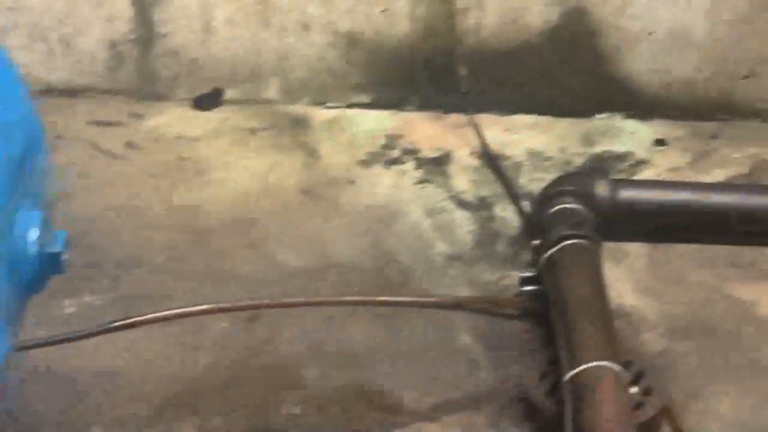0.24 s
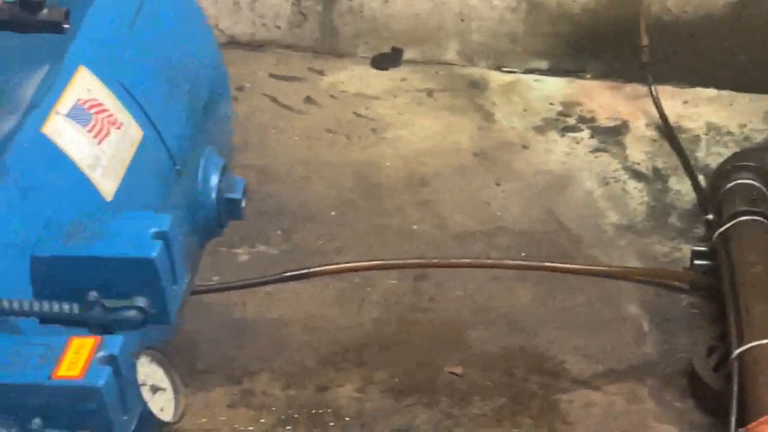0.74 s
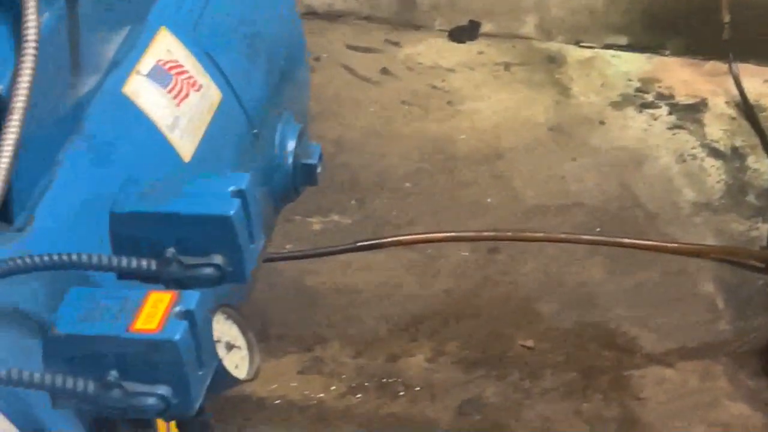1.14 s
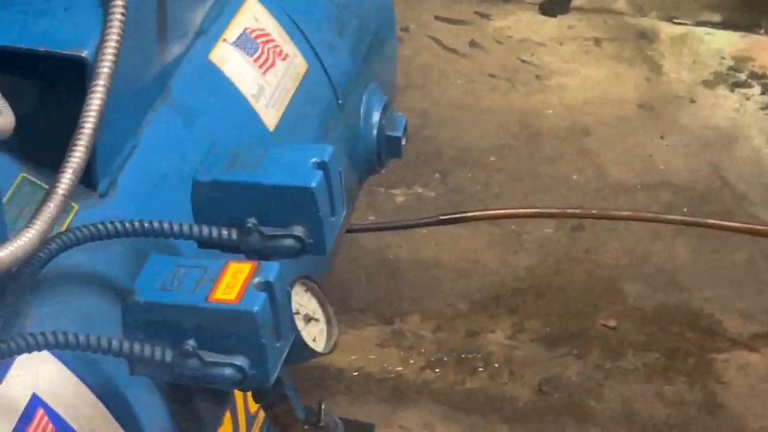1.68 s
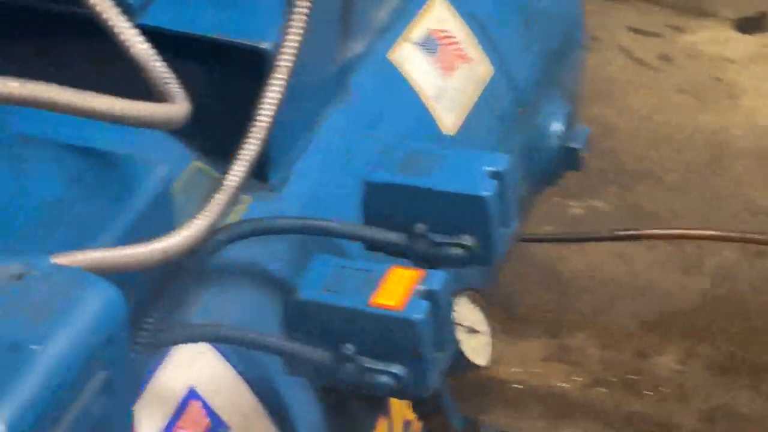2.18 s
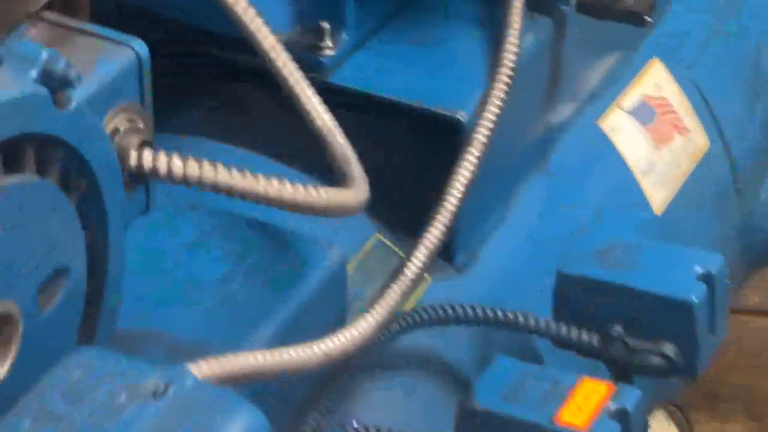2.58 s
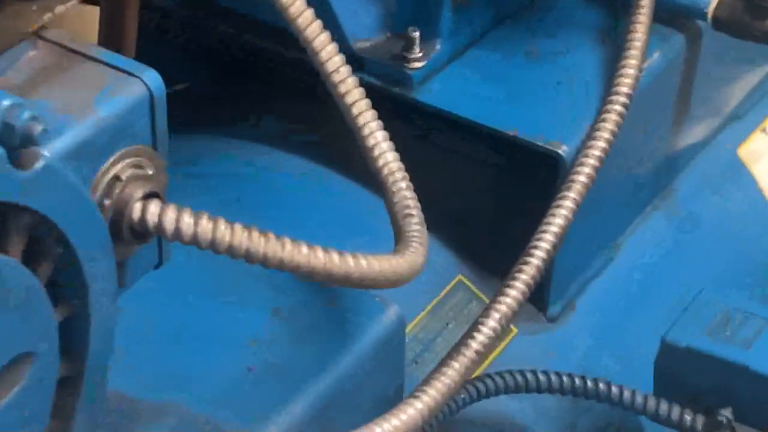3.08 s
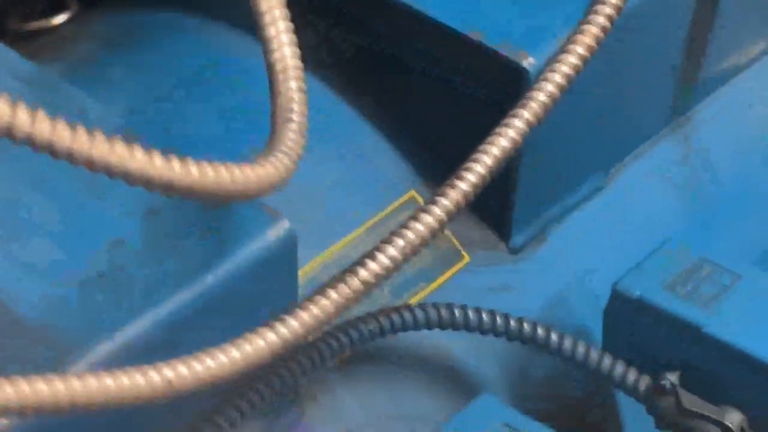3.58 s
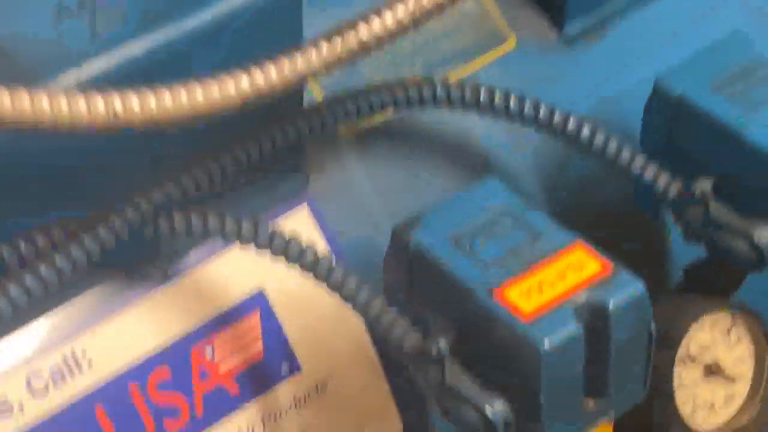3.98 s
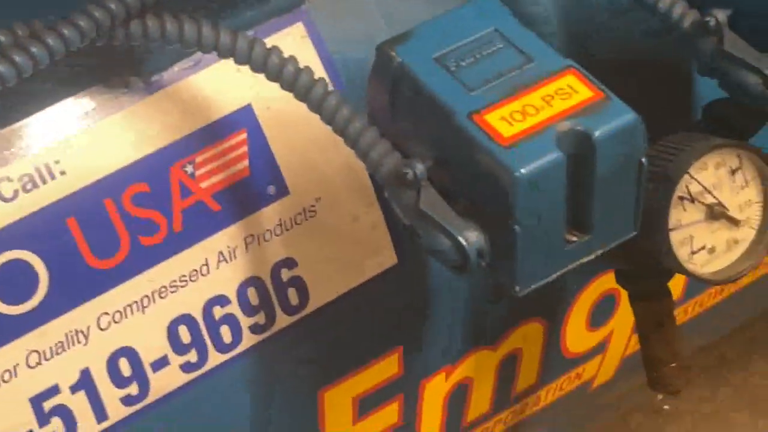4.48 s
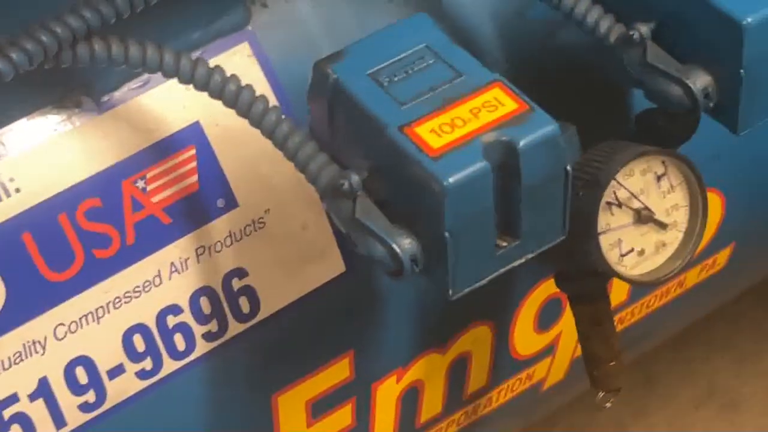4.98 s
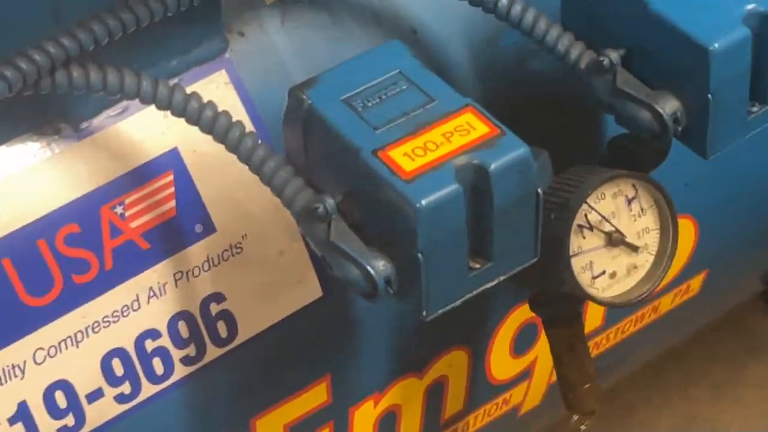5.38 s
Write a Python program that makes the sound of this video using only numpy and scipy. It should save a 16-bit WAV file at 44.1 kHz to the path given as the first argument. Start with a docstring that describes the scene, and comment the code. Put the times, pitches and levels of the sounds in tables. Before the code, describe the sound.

Close handheld stereo in a concrete workshop: a belt-driven piston compressor thumps rapidly, ringing its steel tank. A pressure switch snaps, the strokes stumble and slow to a stop, and an unloader valve releases a bright hiss that fades over a couple of seconds. A steady, raspy electrical buzz remains, getting brighter and louder as the microphone moves in.

```python
"""A belt-driven piston compressor thumps on its tank in a concrete workshop; each stroke rings tank and room.
A mains-driven magnet buzzes all along, tapping its box twice per mains cycle, over hum and room murmur.
The pressure switch snaps, the pump coasts to a halt and the unloader blows off with a fading hiss.
The buzz grows as the microphone moves in towards the switches, through standing waves that shift its colour."""
import sys
import numpy as np
from scipy.fft import rfft, irfft, next_fast_len
from scipy.io import wavfile
from scipy.ndimage import map_coordinates

SR = 44100
rng = np.random.default_rng(int(sys.argv[2]) if len(sys.argv) > 2 else 0)


def int16_out(signal):
    """Quantize to a 16-bit WAV file."""
    q = np.round(np.clip(np.atleast_2d(signal).T, -1, 1) * 32767)
    wavfile.write(sys.argv[1], SR, q.astype(np.int16))


N = 248264  # length in samples


def amp(db):
    """Turn decibels into a plain factor."""
    return 10 ** (np.asarray(db) / 20)


def unit(x):
    """Scale a signal to rms 1."""
    return x / np.sqrt(np.mean(x ** 2) + 1e-20)


def bell(offset, width):
    """A smooth hump of height 1, down to 1/e at one width from its middle."""
    return np.exp(-(offset / width) ** 2)


def along(points, hz):
    """Read (pitch_hz, value) points at any frequency, on a log axis."""
    point_hz, values = np.transpose(points)
    return np.interp(np.log(hz + 1), np.log(point_hz + 1), values)


def curves(rows, t=None):
    """Read each column after the time at times t (every sample by default)."""
    times, *columns = np.transpose(rows)
    if t is None:
        t = np.arange(N) / SR
    return [np.interp(t, times, column) for column in columns]


def wobble(rate, count=N):
    """A smooth random curve with `rate` random points a second."""
    points = rng.standard_normal(int(N * rate / SR) + 4)
    return map_coordinates(points, [np.arange(count) * rate / SR])


def filtered(x, response):
    """Shape x with a complex response given as a function of frequency."""
    size = next_fast_len(N + SR // 4)
    spectrum = rfft(x, size) * response(np.fft.rfftfreq(size, 1 / SR))
    return irfft(spectrum, size)[..., :N]


def causal(db):
    """A response with this colour in dB that rings only after the blow."""
    cepstrum = irfft(np.log(amp(db)))
    half = cepstrum[:len(cepstrum) // 2]
    return np.exp(rfft(2 * half, len(cepstrum)) - cepstrum[0])


def burst(s, rise, t60):
    """Envelope that climbs 20 dB per rise time up to time s, then falls 60 dB in t60 seconds."""
    t = np.arange(N) / SR - s
    return amp(np.where(t < 0, 20 * t / rise, -60 * t / t60))


# how wide the sound lies between left and right: pitch_hz, side_level_db (against the middle)
STEREO_WIDTH = [(60, -21), (180, -7.5), (400, -6), (1100, -3.5), (1800, -8), (2250, -37), (3200, -6),
                (4300, -51), (6500, -73), (7700, -26), (8600, -55), (9600, -66)]


def rush(spectrum, lo_hz=1, hi_hz=SR):
    """Stereo noise of rms 1, with the given spectrum between two soft edges."""
    def response(hz):
        edges = np.sqrt((1 + (lo_hz / (hz + 1)) ** 20) * (1 + (hz / hi_hz) ** 20))
        mid_and_side = np.array([np.ones(len(hz)), amp(along(STEREO_WIDTH, hz))])
        return amp(along(spectrum, hz)) / edges * mid_and_side

    mid, side = filtered(rng.standard_normal((2, N)), response)
    return unit(np.array([mid + side, mid - side]))


TURN_S = .10895  # one crank turn under power
POWERED_RING_DB = -12.5  # free ringing left beside the throb

# strokes and knocks of one powered turn: share_of_turn, level_db, thump_hz, spread_cycles
POWERED_STROKES = [(-.004, -4.5, 345, .6), (.02, -17, 560, .9), (.155, -19.5, 375, 1.5),
                   (.245, -18, 240, .9), (0.41, -10.5, 330, .65), (.465, -15.5, 390, .9),
                   (.585, -20, 385, 1.1), (.775, -12.5, 240, .8), (.885, -22, 570, 1.5)]

# strokes while the pump coasts and rocks to rest: start_s, level_db, thump_hz, spread_cycles
COASTING_STROKES = [(.654, -8.5, 368, 0.76), (.685, -20.5, 255, 1), (.7, -16.5, 250, .7),
                    (.747, -16, 233, .7), (.766, -13.5, 253, 0.83), (.779, -9.5, 340, 0.65),
                    (.84, -14.5, 322, .6), (.897, -14, 224, 0.78), (.916, -20, 230, .7),
                    (.936, -11, 358, 0.9), (.952, -15.5, 300, .5), (.982, -15, 330, 1),
                    (1.027, -25.5, 558, 6.2), (1.048, -28, 550, 4), (1.106, -22, 225, 0.89),
                    (1.118, -19, 195, 1.2), (1.168, -12.5, 355, .8), (1.174, -16.5, 398, 0.87),
                    (1.183, -25, 330, 1.4), (1.2, -24, 322, 1), (1.226, -22.5, 270, 1.5),
                    (1.263, -23, 410, 2.3), (1.28, -15.5, 220, 0.89), (1.298, -16.5, 240, 0.94),
                    (1.326, -19.5, 260, .8), (1.351, -25.5, 385, 5), (1.4, -28.5, 253, 1)]


def strokes():
    """All strokes as (start_s, level_db, thump_hz, spread_cycles, ringing_db): equal turns, then coasting."""
    powered = []
    for turn in np.arange(-2, 6):
        for share, db, hz, cycles in POWERED_STROKES:
            powered.append(((turn + share) * TURN_S - .001, db, hz, cycles, POWERED_RING_DB))
    return powered + [(*row, 0) for row in COASTING_STROKES]


# ringing modes of the pump frame and tank: pitch_hz, relative_level_db, t60_s
TANK_MODES = [(54.7, -22, 0.3), (72.9, -14, 0.55), (153.5, -4.5, 0.46), (165, -11, 0.35),
              (180.4, -0.5, 0.44), (202.7, 0.5, 0.39), (239.6, -5.5, 0.89), (243, -5.5, 1.7),
              (279, -18, 0.048), (317, -19, 0.21), (350, -6, 0.19), (389.7, 3, 0.32), (403, -19, .2),
              (439, 1.5, 0.1), (472, 0.5, 0.2), (499, -9.5, 0.57), (548, -10, 0.4), (573, -8.5, 0.53),
              (606, -8, 0.28), (622, -6.5, 0.32), (643, -10.5, 0.15)]

# colour of the room's answer: pitch_hz, relative_level_db (per Hz)
ROOM_COLOUR = [(30, -35), (70, -16), (125, -43), (170, -8), (400, 5.5), (620, -4.5), (800, -27),
               (1500, -27), (3000, -74)]

# loudness of the belt and valve noise: time_s, level_db
RUSTLE_LEVEL = [(0, -28.5), (.3, -27.5), (.58, -29.5), (.75, -28), (1, -28.5), (1.3, -32), (1.5, -41),
                (1.9, -58), (2.5, -80)]

# colour of the belt and valve noise: pitch_hz, relative_level_db (per Hz)
RUSTLE_COLOUR = [(30, -19), (70, 12), (125, 1), (180, 7), (300, 9), (670, 4), (850, -5.5), (1400, -10),
                 (2100, -3), (3300, -5.5), (4300, -12.5), (5500, -10), (7600, -5), (9200, -16.5),
                 (15500, -11.5)]


def pump(thump_s=0.0018, ring_db=0.0, room_db=-2.0, room_t60=0.36, valve_share=0.058):
    """Each stroke is a short air pulse that rings the tank and the room; valves and belt rustle along."""
    t = np.arange(SR // 2) / SR - .01  # starts just before the blow
    after = np.maximum(t, 0)
    swell = 1 - np.exp(-after / 0.0014)

    ring = 0
    for hz, db, t60 in TANK_MODES:
        ring = ring + amp(db - 60 * after / t60) * np.sin(2 * np.pi * (hz * t + rng.random()))
    ring = ring * swell * np.minimum((t[-1] - t) / .1, 1)  # fades out over the last 0.1 s
    room = rush(ROOM_COLOUR)[:, :len(t)] * swell * amp(-60 * after / room_t60)

    # ring and room are sized against a plain pulse
    pulse = np.exp(-.5 * (t / thump_s) ** 2)
    ring_part = amp(ring_db) * ring / np.linalg.norm(ring)
    room_part = amp(room_db) * room / np.linalg.norm(room[0])
    tail = np.linalg.norm(pulse) / np.sqrt(2) * (ring_part + room_part)

    # one second of lead-in lets strokes from before the start ring on
    chug, valves = np.zeros((2, N + SR)), np.zeros(N + SR)
    for s, db, hz, cycles, ringing_db in strokes():
        start = round((1 + s + t[0]) * SR)
        # at equal cycles, a lower pitch makes a longer thump
        thump = np.exp(-.5 * (hz * t / cycles) ** 2) * np.sin(2 * np.pi * hz * t)
        blow = thump + amp(ringing_db) * tail
        chug[:, start:start + len(t)] += amp(db + rng.normal(0, 0.32)) * blow
        valves[start:start + len(t)] += amp(db) * swell * amp(-60 * after / 1.1)

    rustle = amp(curves(RUSTLE_LEVEL)[0] + 1.5 * wobble(25.8)) * rush(RUSTLE_COLOUR)
    valve_swell = 1 - valve_share + valve_share * unit(valves[SR:]) / 2
    return chug[:, SR:] * amp([[1], [-1.1]]) + rustle * valve_swell


THROB_END_S, THROB_T60_S = 0.68, 0.9  # the drive is lost and the throb rings out
THROB_SWING_DB, THROB_SWELL = 5, .05  # swell with each stroke, and its half length as a share of a turn

# tank ringing locked to the crank: multiple_of_crank_rate, level_db (rms)
CRANK_HARMONICS = [(8, -50.5), (12, -47), (18, -43.5), (20, -33), (22, -32), (26, -26.5), (31, -32),
                   (35, -46), (38, -31.5), (42, -28.5), (45, -33), (49, -45), (55, -43), (59, -42),
                   (61, -42), (62, -38.5), (65, -42), (67, -46), (69, -51), (74, -49), (76, -49),
                   (92, -56.5), (109, -51.5)]


def throb(spread=0.14, waver_db=1.0):
    """Under power the tank rings at multiples of the crank rate, swelling with each stroke."""
    t = np.arange(N) / SR
    fade = amp(-60 * np.maximum(t - THROB_END_S, 0) / THROB_T60_S)
    ease_in = np.minimum(t / .012, 1)

    turns = t / TURN_S
    push = 0
    for share, db, hz, cycles in POWERED_STROKES:
        push = push + amp(db / 2) * bell((turns - share + .5) % 1 - .5, THROB_SWELL)
    swell = unit(amp(THROB_SWING_DB * push / push.max()))

    t = t[fade > 1e-4]  # only while it can be heard
    tone = np.zeros((2, N))
    for multiple, db in CRANK_HARMONICS:
        left_right = spread * rng.normal() * np.array([[1], [-1]])
        phase = 2 * np.pi * (multiple * t / TURN_S + rng.random()) + left_right
        tone[:, :len(t)] += amp(db + waver_db * wobble(5.5, count=len(t))) * np.sin(phase)
    return np.sqrt(2) * ease_in * fade * swell * tone * amp([[1], [-1.1]])


BUZZ_HZ = 120.02  # taps per second
TOP_HZ = 15750  # band limit of the whole sound
PATCH_M = 0.02683  # travel over which the reflections change
EVENNESS = .4  # how evenly loud the buzz's partials are, 0-1
ROUGH, ROUGH_SLOPE = .19, .9  # tap-to-tap difference at 7 kHz, and its growth with frequency
SMEAR_SHARE = 1  # farther away, reflections fill the gaps between taps

# colour of the magnet's box: pitch_hz, relative_level_db
BOX_COLOUR = [(100, -7), (480, -22), (600, -21), (1700, -18), (3000, -12), (4400, -17.5), (5200, -14.5),
              (5700, -3.5), (7000, -3.5), (7850, 7.5), (8100, -12.5), (9800, -14), (11500, -17),
              (13400, -18), (15000, -40)]

# peaks and dips of the box: pitch_hz, half_width_hz, change_db
BOX_PEAKS = [(720, 50, 1), (1440, 40, -4), (2300, 37, 13.5), (2553, 67, -10.5), (3780, 220, 3.5),
             (4800, 60, 5.5), (5510, 110, 5), (6700, 160, 4.5), (9000, 124, -26), (11440, 97, 19)]

# microphone's way through the reflections: time_s, position_m
MICROPHONE_PATH = [(0, 0.067), (2, -0.02), (2.4, 0.054), (3, 0.086), (3.4, 0.19), (3.85, 0.19),
                   (4.35, 0.201), (4.75, 0.3), (5.63, 0.27)]

# closeness of the microphone to the magnet: time_s, closeness_db
MAGNET_CLOSENESS = [(0, -6), (2.1, -4), (2.8, -4.5), (3.35, -4), (3.62, -2), (3.95, -2), (4.18, 1),
                    (4.55, 0.2), (4.95, -0.2), (5.6, 1)]

# growl, rasp, ring and sizzle: lower_edge_hz, level_db (at 0 dB closeness), share_of_closeness
BUZZ_PARTS = [(400, -57.5, 0.16), (2580, -50.5, 0.37), (4980, -41, 1.15), (6900, -39, 1.15)]


def magnet(ring_db=15, echo_hz=2500, size=512):
    """The armature taps twice per mains cycle and rings the box, heard through shifting reflections."""
    t = np.arange(int(N / SR * BUZZ_HZ) + 2) / BUZZ_HZ  # one row per tap
    place, = curves(MICROPHONE_PATH, t)
    close_db, = curves(MAGNET_CLOSENESS, t)
    hz = np.arange(size // 2 + 1) * BUZZ_HZ

    decay = amp(-(ring_db + SMEAR_SHARE * close_db[:, None]) * np.arange(size) / size)
    decay = decay / np.sqrt(np.mean(decay ** 2, axis=1, keepdims=True))

    # random reflections that blend from patch to patch along the path
    patches = bell(place[:, None] / PATCH_M - np.arange(-3, 16), .7)

    def shifting():
        return patches @ rng.standard_normal((2, patches.shape[1], size))

    # low partials ring on from tap to tap, high ones die in between
    lasting = echo_hz / (echo_hz + hz)
    taps = rfft(decay * shifting()) * (1 - lasting) + rfft(shifting()) * lasting
    taps = taps / (abs(taps) + 0.7 * abs(taps).mean()) ** EVENNESS

    # no two taps are quite alike, least of all in the treble
    chatter = rfft(decay * rng.standard_normal((2, len(t), size)))
    roughness = ROUGH * np.minimum(hz / 7000, 1.3) ** ROUGH_SLOPE
    weak = ~np.isin(np.arange(len(hz)), list(STRONG_PARTIALS))  # the strong ones sound in whine()
    taps = weak * taps / taps.std() + roughness * chatter / chatter.std()

    colour_db = along(BOX_COLOUR, hz)
    for centre_hz, width_hz, db in BOX_PEAKS:
        colour_db = colour_db + db * bell(hz - centre_hz, width_hz)
    taps = taps * causal(colour_db)

    # each part of the buzz follows the closeness in its own measure
    upper_edges = [row[0] for row in BUZZ_PARTS[1:]] + [TOP_HZ]
    heard = 0
    for (lo, db, share), hi in zip(BUZZ_PARTS, upper_edges):
        band = taps * ((hz > lo) & (hz <= hi))
        gain = amp(db + share * close_db) / np.linalg.norm(band, axis=-1)
        heard = heard + band * gain[..., None]

    # lay the taps end to end and read them at the sample rate
    cycles = irfft([heard[0], heard[1] * amp(along(STEREO_WIDTH, hz))])
    cycles = cycles.reshape(2, -1) * size / np.sqrt(2)
    position = np.arange(N) / SR * BUZZ_HZ * size
    mid, side = [map_coordinates(channel, [position]) for channel in cycles]
    return np.array([mid + side, mid - side])


SCUFF_S, SCUFF_LENGTH_S, SCUFF_DB = 4.8, 0.1, -61  # middle, half length and level of a soft scuff
FLOOR_WAVER_DB = .8  # slow random waver of the murmur

# mains hum, and an idling motor that beats against it: pitch_hz, level_db (rms, before closeness)
HUM_TONES = [(60, -71), (116.9, -71.5), (120, -66.5), (240, -54), (360, -64)]

# a faint sinking tone: time_s, pitch_hz, level_db (rms)
SINKING_TONE = [(1.9, 341, -74), (2.6, 334, -62), (3.3, 331, -60.5), (3.8, 330, -56), (4.12, 328.3, -55),
                (4.35, 325, -60.5), (4.8, 326.4, -70), (5.6, 319, -76)]

# soft bumps: peak_s, pitch_hz, level_db, rise_s, t60_s
SOFT_BUMPS = [(4.01, 430, -43, .012, .065), (4.25, 520, -57, .004, .03), (4.313, 320, -45.5, .005, .05),
              (4.94, 430, -56, .008, .05)]

# tones that come and go: peak_s, half_length_s, pitch_hz, level_db (rms)
PASSING_TONES = [(1.4, 0.29, 251, -48), (1.2, 0.33, 297, -55), (1.9, 0.94, 422, -64), (2.9, 1, 282, -61.5),
                 (2.95, 0.56, 166, -64), (2.5, 0.81, 568, -66), (3.3, 0.17, 499, -64),
                 (3.8, 0.44, 520, -70)]

# colour of the scuff: pitch_hz, relative_level_db (per Hz)
SCUFF_COLOUR = [(200, -12), (380, -3), (520, -9), (700, -3), (880, 2), (1100, -15), (3000, -45)]

# loudness of the workshop's murmur: time_s, level_db
MURMUR_LEVEL = [(0, -30.5), (1.6, -51), (2.1, -57), (3.9, -59.5), (4.5, -57.5), (5.63, -59.5)]

# colour of the murmur: pitch_hz, relative_level_db (per Hz)
MURMUR_COLOUR = [(20, -60), (60, 0), (115, -5), (170, -3), (300, 4), (520, -5), (900, -12.5), (1500, -25),
                 (4000, -29), (15000, -46)]


def workshop():
    """Sines make the hum and faint tones; shaped noise makes the scuff, the murmur and part of each bump."""
    t = np.arange(N) / SR

    # the hum swells as the microphone passes the motor: time_s, change_db
    closeness = amp(curves([(2.1, 0.5), (3.05, 4.5), (4.1, 0), (5.6, 1)])[0])
    hum = 0
    for hz, db in HUM_TONES:
        hum = hum + amp(db + 0.59 * wobble(2.18)) * np.sin(2 * np.pi * (hz * t + rng.random()))
    hum = closeness * hum

    drone_hz, drone_db = curves(SINKING_TONE)
    drone = amp(drone_db + 1.2 * wobble(6.6)) * np.sin(2 * np.pi * np.cumsum(drone_hz) / SR)

    bumps = 0
    for s, hz, db, rise, t60 in SOFT_BUMPS:
        noise = rush([(hz / 2, -4), (hz, 0), (hz * 2, -10), (hz * 4, -36)])
        body = np.sin(2 * np.pi * hz * (t - s)) + .7 * noise
        bumps = bumps + amp(db) * burst(s, rise, t60) * body

    tones = 0
    for s, length, hz, db in PASSING_TONES:
        wave = np.sin(2 * np.pi * hz * t + .5 * wobble(4.04))
        tones = tones + amp(db) * bell(t - s, length) * wave

    scuff = amp(SCUFF_DB) * bell(t - SCUFF_S, SCUFF_LENGTH_S) * rush(SCUFF_COLOUR)
    murmur = amp(curves(MURMUR_LEVEL)[0] + FLOOR_WAVER_DB * wobble(5.19)) * rush(MURMUR_COLOUR)
    return np.sqrt(2) * (hum + drone + tones) + bumps + scuff + murmur


# ringing of the switch lever: pitch_hz, level_db, t60_s
LEVER_RINGS = [(4540, -22.5, 0.044), (6840, -24.5, .06)]


def switch():
    """The pressure switch snaps over: its lever rings and a little air spits out."""
    # pitch_hz, relative_level_db (per Hz)
    colour = [(500, -25), (2000, 2.0), (3500, 2), (4600, -1.0), (7000, 6.5), (9000, -2.5), (15000, -3.0)]
    trip_s = .608
    t = np.arange(N) / SR
    snap = amp(-27) * burst(trip_s, rise=.003, t60=0.03)
    spit = amp(-26.5) * burst(trip_s, rise=0.062, t60=0.34)
    ring = 0
    for hz, db, t60 in LEVER_RINGS:
        ring = ring + amp(db) * burst(trip_s, rise=.001, t60=t60) * np.sin(2 * np.pi * hz * t)
    return rush(colour) * (snap + spit) + ring


OPEN_S, OPEN_RISE_S = 0.7835, 0.043  # the unloader valve opens
EMPTY_S, EMPTY_DB_PER_S = 3.3, 11  # the line runs empty and the jet dies faster by this much
LEAK_DB = -55  # faint hiss that stays

# colour of the air jet: pitch_hz, relative_level_db (per Hz)
JET_COLOUR = [(500, -13), (1400, -11.5), (2000, -9.5), (2400, -0.5), (2800, -4), (3900, -4), (5500, -4),
              (8500, 1.5), (10000, -7), (12000, -2.5), (14000, -4.5), (15600, -2.5)]

# body, hiss and sizzle: lower_edge_hz, upper_edge_hz, opening_level_db, fall_db_per_s, share_of_surge
JET_PARTS = [(20, 4020, -40.5, 5.5, 1.85), (4460, 8340, -29.5, 4.5, 0.82), (9040, 17100, -23, 7.5, 0.81)]

# air pushed through the valve by the coasting pump: peak_s, half_length_s, boost_db (before share_of_surge)
AIR_SURGES = [(0.865, 0.021, 2.5), (1.04, 0.058, 4.2), (1.37, 0.13, 5), (1.67, 0.12, 1.8)]


def unloader():
    """Trapped air escapes; the jet fades as its pressure falls and surges with the pump's last turns."""
    t = np.arange(N) / SR
    valve = np.clip((t - OPEN_S) / OPEN_RISE_S, 0, 1)
    surge_db = sum(db * bell(t - s, length) for s, length, db in AIR_SURGES)
    empty_db = EMPTY_DB_PER_S * np.maximum(t - EMPTY_S, 0)
    flutter_db = 0.58 * wobble(30.08)
    jet = 0
    for lo, hi, db, fall, share in JET_PARTS:
        level_db = db - fall * (t - OPEN_S) + share * surge_db
        jet = jet + amp(level_db) * rush(JET_COLOUR, lo, hi)
    leak = amp(LEAK_DB) * rush(JET_COLOUR, hi_hz=7640)
    return valve * (amp(flutter_db - empty_db) * jet + leak)


TAP_DELAY_S, TAP_SCATTER = .0007, .85  # lag of the taps behind the mains; scatter of partials (radians)

# loud spots (antinodes) the microphone passes, listed for each multiple of the buzz rate:
# peak_s, half_length_s, level_db (rms)
STRONG_PARTIALS = {4: [(2.1, 0.43, -64.5), (3.2, 0.57, -66)], 5: [(3, 0.96, -69.5), (4.25, 0.36, -72.5),
                   (5.3, 0.61, -67)], 7: [(1.9, 0.82, -62), (3.15, 0.3, -70), (4.45, 0.78, -67),
                   (5.4, 0.5, -76)], 9: [(3, 0.61, -66.5), (4.3, .4, -71), (5.3, 0.52, -71)],
                   10: [(1.9, 0.43, -70), (2.78, 0.55, -59.5), (4.25, 0.4, -60), (5.2, 1, -69)],
                   11: [(2.5, 0.74, -62), (3.9, 0.48, -62.5), (5.3, 0.73, -58.5)], 13: [(2.2, 0.39, -61),
                   (3, 0.52, -65), (3.95, 0.26, -64), (5, 0.77, -64)], 19: [(1.8, 0.94, -67),
                   (2.75, 0.33, -56.5), (3.9, 0.37, -52), (5.2, 1, -52)], 23: [(3.36, 0.48, -55),
                   (3.98, 0.18, -64), (5.2, 0.58, -53.5)], 24: [(1.8, 0.55, -58), (3.7, 0.66, -56),
                   (5.5, 1, -53)], 25: [(1.9, 0.91, -59.5), (3.45, 0.53, -57.5), (5.2, .85, -62)],
                   26: [(2.14, 1, -61.5), (3.55, 0.5, -55), (4.73, 0.99, -59)], 27: [(2.3, 1, -59),
                   (3.82, 0.18, -47.5), (4.7, 0.23, -54), (5.65, 0.63, -49)], 47: [(2.25, 0.9, -64),
                   (3.41, 0.41, -51), (4.68, 0.76, -52.0)], 50: [(2.95, 1, -51.5), (5.0, 0.65, -51)],
                   51: [(2.75, 1, -54.5), (4.18, 0.74, -45.5), (5.33, 0.81, -42)], 52: [(4.06, .36, -45.5),
                   (5.13, .9, -47)], 58: [(3.22, 0.9, -48.5), (4.49, 0.39, -56), (5.25, 0.9, -70)],
                   61: [(3.01, 1, -49), (4.42, 0.49, -44.5), (5.51, 0.18, -41.5)], 62: [(2.65, .9, -53),
                   (3.6, .28, -44.5), (4.38, .28, -42), (5.56, .9, -44)], 63: [(2.24, .46, -43),
                   (3.18, 0.18, -43), (4.55, 0.11, -44), (4.6, 1, -40)], 64: [(2.25, 0.9, -55),
                   (3.41, 0.57, -47.0), (4.34, 0.26, -43), (4.82, 0.62, -40)], 65: [(2.79, 0.94, -46),
                   (3.54, 0.35, -45), (4.75, 0.48, -44.5), (5.5, 0.31, -39.5)]}


def whine(waver_db=.5, wander=.15):
    """The taps' strong partials stand in the room; each swells as the microphone passes an antinode."""
    t = np.arange(N) / SR
    coarse = t[::256]  # slow changes need few points

    def slow(rate):
        count = int(t[-1] * rate) + 2
        return np.interp(coarse * rate, np.arange(count), rng.standard_normal(count))

    mid, side = np.zeros((2, N))
    for multiple, passes in STRONG_PARTIALS.items():
        hz = multiple * BUZZ_HZ
        swell = sum(amp(db) * bell(coarse - s, length) for s, length, db in passes)
        level = np.interp(t, coarse, amp(waver_db * slow(7.7)) * swell)
        drift = np.interp(t, coarse, TAP_SCATTER * rng.normal() + wander * slow(3.04))
        phase = 2 * np.pi * hz * (t - TAP_DELAY_S) + drift
        mid += level * np.cos(phase)
        side += level * amp(along(STEREO_WIDTH, hz)) * np.sin(phase)
    return np.sqrt(2) * np.array([mid + side, mid - side])


def scene():
    """The compressor in its workshop: all sources added together."""
    return pump() + throb() + magnet() + workshop() + switch() + unloader() + whine()


# lag of the left microphone port behind the right: pitch_hz, lag_cycles
PORT_LAG = [(8800, 0.00065), (10100, 0.55), (12100, 0.97), (13850, 1.66), (15600, 1.66)]


def record(dry):
    """The two microphone ports drift out of phase in the top treble; nothing passes the band limit."""
    def response(hz):
        left_and_right = np.array([[-1j], [0]])
        lag = np.exp(left_and_right * 2 * np.pi * along(PORT_LAG, hz))
        return lag * (hz < TOP_HZ)

    return filtered(dry, response)


dry = scene()
out = record(dry)
int16_out(out)
```